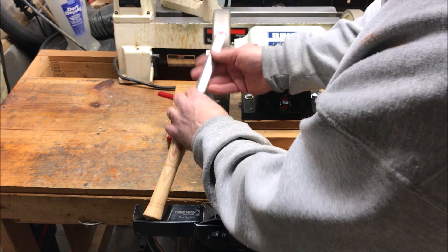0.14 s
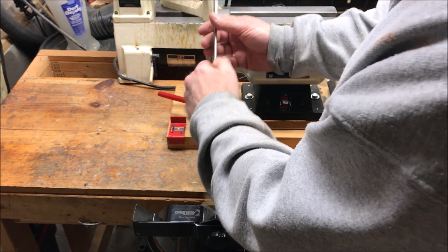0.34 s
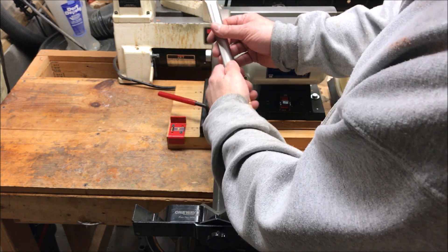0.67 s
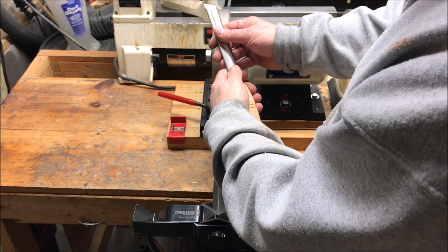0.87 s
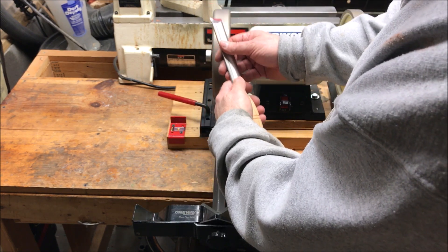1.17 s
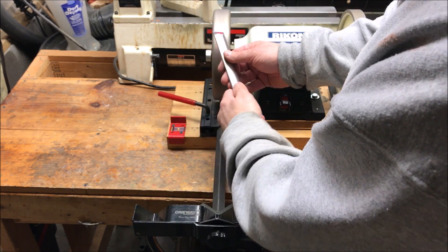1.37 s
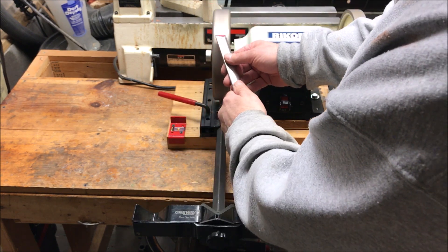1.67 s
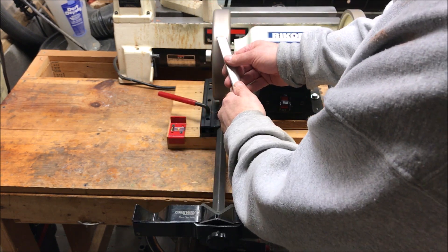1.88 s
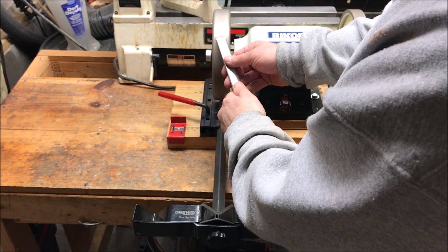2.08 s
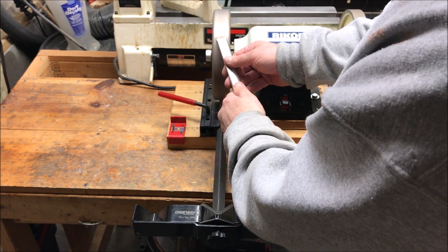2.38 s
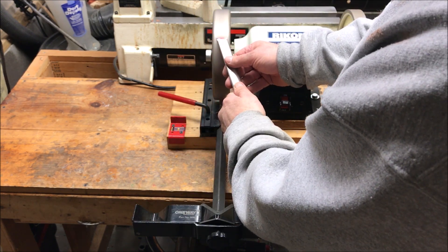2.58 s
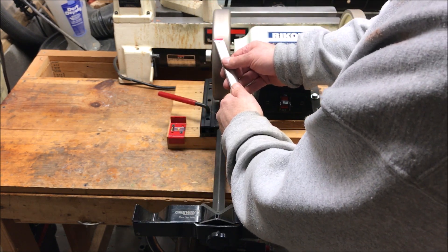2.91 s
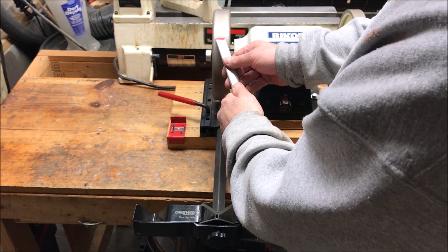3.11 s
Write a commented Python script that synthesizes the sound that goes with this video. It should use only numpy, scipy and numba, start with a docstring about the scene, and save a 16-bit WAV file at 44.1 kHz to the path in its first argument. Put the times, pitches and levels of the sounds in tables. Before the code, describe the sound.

Close single-microphone sound of an idling grinder in a small shop: brief bright grinding, a fading metallic ring, a scuff and double click midway, then uneven hissing contact that continues to the end.

```python
"""A slow bench grinder idles in a workshop: sines for hum and rotor-slot whine, filtered noise for bearing rush.
A steel chisel, driven by dense random grains, leaves the wheel, whose noise-driven modes ring on.
The tool is seated in its rest with a scuff and a click (short noise bursts through resonances),
then pressed to the wheel again. A noise rumble shudders in the bench and a noise tail stands for the shop.
One microphone, whose bass is turned down while the sound is loud."""
import sys
import numpy as np
from scipy import signal
from scipy.fft import rfft, irfft
from scipy.io import wavfile
from scipy.ndimage import uniform_filter1d
from numba import njit

SR = 44100
rng = np.random.default_rng(int(sys.argv[2]) if len(sys.argv) > 2 else 0)


def level_to_linear(level):
    """Convert decibel levels to linear amplitude factors, elementwise."""
    exponent = np.asarray(level, float) / 20
    return 10 ** exponent


def store_wav(level_fs):
    """Save 16-bit WAV to argv[1]."""
    pcm = np.round(np.clip(np.atleast_2d(level_fs), -1, 1) * 32767)
    wavfile.write(sys.argv[1], SR, pcm.T.astype(np.int16))


N = 143325

# motor tones, 48 rotor slots: [multiple of shaft speed, multiple of mains hum, level/dB rms]
MOTOR_TONES = [(2, 0, -64), (0, 1, -51), (0, 2, -52), (1, 2, -60), (2, 2, -52), (-1, 3, -60), (0, 3, -40),
               (1, 3, -59), (0, 4, -50), (-1, 6, -61), (27, 0, -62), (31, 0, -65), (33, 0, -65),
               (35, 0, -64), (48, -3, -62), (49, -2, -66), (48, -1, -61), (47, 0, -61), (48, 0, -48),
               (49, 0, -60), (51, 0, -79), (48, 1, -78), (48, 2, -72), (57, 0, -72), (58, 0, -67),
               (47, 3, -70), (48, 3, -66), (61, 0, -69), (62, 0, -66), (48, 4, -71), (48, 5, -76),
               (48, 6, -77), (96, -3, -78), (96, -2, -64), (90, 0, -74), (91, 0, -72), (96, -1, -59),
               (94, 0, -75), (96, 0, -69), (97, 0, -72), (99, 0, -77), (96, 1, -72), (96, 5, -79)]
# the low hum swells and sinks: [t/s, level/dB]
HUM_SWELL = [(0, 0), (.3, 1.5), (1.0, 1.5), (1.45, 1), (1.62, -2), (2.0, -.5), (2.6, .5), (3.25, 0)]
# outline of bearings, air and room: [f/Hz, relative level/dB per Hz]
RUSH_OUTLINE = [(15, -63), (25, -15.5), (120, -10.5), (185, -19), (363, -5.5), (416, -7.5), (476, -7.5),
                (531, -9), (1160, -16.5), (1440, -25), (1560, -20), (1840, -23.5), (2280, -32),
                (2690, -22.5), (3160, -41), (4490, -28), (16000, -58)]
# resonances of the grinder housing: [f/Hz, width/Hz, level/dB]
HOUSING_MODES = [(53.4, 5.6, -61.5), (185.2, 2.1, -61), (269.2, 9.3, -53.5), (629, 18, -64),
                 (702, 12, -56.5), (801.5, 2.7, -55), (1081, 7.9, -62.5), (1300, 46, -55.5),
                 (1880, 83, -59.5), (2600, 780, -70), (4390, 59, -65.5), (5240, 19, -69.5), (7200, 64, -75),
                 (9160, 190, -76), (11700, 2400, -80)]
# steel on the wheel, leaving and then pressing:
# [t/s, hiss level/dB, wheel ringing over hiss level/dB, tilt of the ringing/dB per octave]
LEAVING_PRESSURE = [(0, -26.5, 0.5, 3), (.035, -24.5, 4, 0.5), (.075, -24, 3, 1.5), (.11, -26.5, 2.5, -0.5),
                    (.13, -23, -3, 0.5), (.155, -25, -21, 6), (.168, -22.5, -6, -1.5), (.178, -35, -8, 3)]
PRESSING_PRESSURE = [(2.497, -39.5, 1, 11), (2.508, -33.5, 5.5, 11), (2.525, -31.5, -1, -2),
                     (2.57, -46, 3, 15), (2.579, -34, 0.5, 9.5), (2.66, -39.5, 9, -3.5),
                     (2.692, -32.5, 11, 1.5), (2.73, -32, 1, -8.5), (2.8, -28, 5, -1.7), (2.87, -29, 3, 4),
                     (2.95, -29.5, 3.5, 0.26), (3.02, -30, 4, 1.5), (3.1, -28, 0, 1.7),
                     (3.19, -30, 4.5, 4.5), (3.21, -28, 7.5, -0.5), (3.25, -31, -1, 0)]
# outline of the grit hiss: [f/Hz, relative level/dB per Hz]
GRIT_OUTLINE = [(500, -20.5), (1000, -16), (1700, -13.5), (2200, -9.5), (3000, -3), (4200, -2), (4900, -4),
                (7700, -13), (10000, -7.5), (13000, -6.5), (14600, -27), (15500, -7.5)]
# pitches of the hand-damped chisel: [f/Hz]
CHISEL_PITCHES = [1050, 2652, 2684, 3280, 3410, 3662, 3860, 4050, 5577, 5631, 5830, 6735, 7010, 7180, 8620,
                  9780, 11900, 12100]
# the same modes: [width/Hz, level over hiss leaving/dB, level over hiss pressing/dB]
CHISEL_MODES = [(190, -34, -27), (19.7, -23, -11), (24.9, -16.5, -12), (30, -44, -15.5), (59, -14.5, -39),
                (40, -12.5, -15), (45, -24, -10), (50, -23, -25), (24.9, -20.5, -5), (25, -43, -13),
                (100, -15.5, -13), (56, -15.5, -9), (110, -31, -13), (100, -9.5, -9.5), (150, -8.5, -8),
                (60, -24, -9.5), (120, -20, -8), (550, -9, -35)]
# pitches of the steel wheel: [f/Hz]
WHEEL_PITCHES = [1564.2, 1679.6, 4182, 4229, 4356, 7540, 7768, 7903, 8018, 8689, 10654, 10829, 11189, 11467,
                 12090, 13660, 13890, 14290, 14438, 14727, 15050]
# the same modes: [level struck at lift-off/dB, free t60/s, relative level while ground/dB]
WHEEL_MODES = [(-42.5, 3.5, -28), (-31, 3.05, -19), (-38, 0.78, -3.5), (-39, .4, -17.5), (-32, 0.61, -8.5),
               (-46, 0.41, -17), (-48, .9, -20), (-37, 0.27, -11), (-29.5, 0.22, -10), (-57, .37, -39),
               (-50, 0.3, -15), (-41, 0.3, -19), (-35, 0.96, -13.5), (-43, 0.87, -17), (-49, 0.17, -29),
               (-45, 0.82, -22), (-50, 0.4, -20), (-48, 0.55, -28), (-31, 0.7, -11), (-43, .36, -15),
               (-47, 0.72, -33)]
# the tool shakes the bench: [t/s, level/dB rms]
BENCH_SHUDDER = [(0, -65), (.1, -47), (.17, -37.5), (.2, -59), (2.52, -63.5), (2.55, -41), (2.8, -45),
                 (2.85, -65), (3.05, -51), (3.15, -70), (3.25, -58)]
# contacts of the tool butt in its rest: [t/s, contact strength/dB, brightness f/Hz, scuff length/s]
SEATING_CONTACTS = [(1.2445, -35, 2840, 0.032), (1.254, -25, 1200, 0.005), (1.266, -28, 730, 0.0023),
                    (1.277, -21.5, 600, 0.0013), (1.3463, -22.5, 17500, 0.017),
                    (1.354, -19.5, 3030, 0.0037), (1.371, -24.5, 1300, 0.0061), (1.4, -34.5, 960, 0.0059)]
# resonances of the rest: [f/Hz, width/Hz, relative level/dB]
REST_MODES = [(355, 47, 1.5), (624, 90, 0), (1040, 61, 3), (1400, 500, -7), (1850, 70, -7), (2640, 90, 5),
              (3300, 1500, -6), (3950, 80, -9), (4350, 60, -9), (5570, 70, 0), (5810, 60, -1)]
# dips of all that lies between the ringing tones: [middle t/s, length/s, level/dB at the middle]
NOISE_DIPS = [(2.526, 0.022, -22), (2.699, .022, -13), (2.837, 0.044, -29), (3.124, 0.026, -12),
              (3.189, 0.022, -12)]

SHAFT_HZ, MAINS_HUM_HZ = 29.888, 120.03
TONE_WAVER_DB, TONE_WAVER_HZ = 0.7, 2.3
HUM_TOP_HZ = 500  # motor tones above this count as whine
RUSH_DB, RUSH_THROB = -47, 0.19
GRAINS_PER_S, GRAIN_SPREAD_DB = 9000, 2.5
GRIP_DB, GRIP_HZ = 0.5, 13.5  # the shifting grip favours now one mode, now another
LIFT_OFF_S = 0.165
SLIDE_OFF_S = 0.014  # the edge drags off the rim for this long
LEAVING_T60_S, PRESSING_T60_S = 0.16, 0.4  # wheel damping under the edge
TILT_PIVOT_HZ = 6000
SHARP_HZ = 65  # narrower chisel modes are heard as tones, wider ones as coloured hiss
CORE_HZ = 130  # band around a mode that is heard as its tone
SHUDDER_LOW_HZ, SHUDDER_HIGH_HZ = 580, 1300
SHOP_DB, SHOP_CUT_HZ = -13.5, 8000
SHOP_T60_S, SHOP_TREBLE_T60_S = 0.5, 0.37  # below and above the cut
KNOCK_SHARE = 0.6  # share of each contact's energy in its opening knock
REST_CRACK_DB, REST_BODY_DB = -15, -16  # direct contact, resonances of the rest
BASS_HZ, BASS_KNEE_DB, BASS_SLOPE, BASS_RELEASE_HZ = 170, -31, 0.7, 1.5
TOP_HZ = 15850


def rms_one(x):
    """Scale to unit rms."""
    return x / np.sqrt(np.mean(x ** 2) + 1e-20)


def in_time(rows, outside=None):
    """Columns of a curve at every sample."""
    s, *columns = np.transpose(rows)
    t = np.arange(N) / SR
    return np.array([np.interp(t, s, c, outside, outside) for c in columns])


def coloured(x, outline):
    """Shape a steady signal by an outline in Hz and dB; rms 1."""
    hz, db = np.transpose(outline)
    grid = np.maximum(np.arange(N // 2 + 1) * SR / N, 1)
    gain = level_to_linear(np.interp(np.log(grid), np.log(hz), db))
    return rms_one(irfft(rfft(x) * gain, N))


def drift(rate_hz):
    """Slow chance with spread 1, drawn at every 40th sample."""
    r = np.exp(-2 * np.pi * rate_hz * 40 / SR)
    white = rng.standard_normal(N // 40 + 2002)
    slow = signal.lfilter([1], [1, -2 * r, r * r], white)[2000:]
    return np.interp(np.arange(N) / 40, np.arange(len(slow)), rms_one(slow))


def resonance(x, hz, width_hz):
    """Two-pole resonance that turns unit noise into unit noise."""
    r = np.exp(-np.pi * width_hz / SR)
    zeros = np.sqrt((1 - r * r) / 2) * np.array([1, 0, -1])
    poles = [1, -2 * r * np.cos(2 * np.pi * hz / SR), r * r]
    return signal.lfilter(zeros, poles, x + 1e-18)


def core(x, hz):
    """The part of a ringing mode close to its pitch."""
    return np.sqrt((1 - np.exp(-2 * np.pi * CORE_HZ / SR)) / 2) * resonance(x, hz, CORE_HZ)


@njit
def ring(drive, keep, turn):
    """A mode whose damping changes from sample to sample."""
    out, state = np.zeros(len(drive)), 0j
    for i in range(len(drive)):
        state = state * turn * keep[i] + drive[i]
        out[i] = state.imag
    return out


def motor_tones():
    """Low hum and whine: sines at sums of shaft and mains multiples, wavering a little; only the hum swells."""
    t = np.arange(N) / SR
    hum, whine = np.zeros(N), np.zeros(N)
    wavers = [level_to_linear(TONE_WAVER_DB * drift(TONE_WAVER_HZ)) for _ in range(6)]
    swell = level_to_linear(in_time(HUM_SWELL)[0])
    for k, (shaft, mains, db) in enumerate(MOTOR_TONES):
        hz = shaft * SHAFT_HZ + mains * MAINS_HUM_HZ
        # pure mains multiples start in step, tones of the shaft anywhere
        phase = 0.25 + rng.random() * (shaft != 0)
        level = np.sqrt(2) * level_to_linear(db) * wavers[k % 6]
        tone = level * np.sin(2 * np.pi * (hz * t + phase))
        if hz > HUM_TOP_HZ:
            whine += tone
        else:
            hum += tone * swell
    return hum, whine


def bearing_rush():
    """Steady broadband noise, plus housing resonances fed with noise that throbs with the mains."""
    t = np.arange(N) / SR
    rush = level_to_linear(RUSH_DB) * coloured(rng.standard_normal(N), RUSH_OUTLINE)
    throb = 1 + RUSH_THROB * np.sin(2 * np.pi * MAINS_HUM_HZ * t)
    shaking = rng.standard_normal(N) * throb
    for hz, width_hz, db in HOUSING_MODES:
        rush += level_to_linear(db) * resonance(shaking, hz, width_hz)
    return rush


def grit_grains():
    """Dense grit strikes: sparse impulses of random size and sign; rms 1."""
    size_db = GRAIN_SPREAD_DB * np.minimum(rng.exponential(1, N), 5)
    sizes = level_to_linear(size_db) * rng.choice([-1, 1], N)
    return rms_one(sizes * (rng.random(N) < GRAINS_PER_S / SR))


def chisel(grains, leaving, pressing):
    """The grains shake the hand-damped chisel; narrow modes give tones, the rest goes to the hiss."""
    hiss, tones = np.zeros(N), np.zeros(N)
    for hz, (width_hz, leaving_db, pressing_db) in zip(CHISEL_PITCHES, CHISEL_MODES):
        force = leaving * level_to_linear(leaving_db) + pressing * level_to_linear(pressing_db)
        grip = level_to_linear(GRIP_DB * drift(GRIP_HZ))
        mode = resonance(grains * grip * force, hz, width_hz)
        tone = core(mode, hz) * (width_hz < SHARP_HZ)
        tones += tone
        hiss += mode - tone
    return hiss, tones


def wheel(leaving, pressing):
    """Noise force rings the wheel, damped under the edge; a blow at lift-off leaves it ringing freely."""
    t = np.arange(N) / SR
    _, ringing_db, tilt_db = in_time(LEAVING_PRESSURE + PRESSING_PRESSURE)
    pressure = leaving * (t < LIFT_OFF_S - SLIDE_OFF_S) + pressing
    touched = pressure > 1e-5
    touched_t60 = np.where(t < LIFT_OFF_S, LEAVING_T60_S, PRESSING_T60_S)
    held = level_to_linear(-60 / (touched_t60 * SR))
    hiss, tones = np.zeros(N), np.zeros(N)
    for hz, (struck_db, free_t60, ground_db) in zip(WHEEL_PITCHES, WHEEL_MODES):
        tilt = tilt_db * np.log2(hz / TILT_PIVOT_HZ)
        force = pressure * level_to_linear(ground_db + ringing_db + tilt)
        drive = rng.standard_normal(N) * force * np.sqrt(2 * (1 - held * held))
        # each mode is let go at its own moment of the slide
        let_go_s = LIFT_OFF_S + SLIDE_OFF_S * rng.uniform(-0.5, 0.5)
        drive[int(let_go_s * SR)] += level_to_linear(struck_db)
        keep = np.where(touched, held, level_to_linear(-60 / (free_t60 * SR)))
        mode = ring(drive, keep, np.exp(2j * np.pi * hz / SR))
        tone = core(mode, hz)
        tones += tone
        hiss += mode - tone
    return hiss, tones


def grinding():
    """Steel on the wheel: direct grit hiss, the shaken chisel and the ringing wheel follow the pressure."""
    leaving = level_to_linear(in_time(LEAVING_PRESSURE, -200)[0])
    pressing = level_to_linear(in_time(PRESSING_PRESSURE, -200)[0])
    grains = grit_grains()
    grit_hiss = coloured(grains, GRIT_OUTLINE) * (leaving + pressing)
    chisel_hiss, chisel_tones = chisel(grains, leaving, pressing)
    wheel_hiss, wheel_tones = wheel(leaving, pressing)
    return grit_hiss + chisel_hiss + wheel_hiss, chisel_tones + wheel_tones


def shudder():
    """The bench rumbles under grinding: band-passed noise that follows a level curve."""
    band = signal.butter(2, [SHUDDER_LOW_HZ, SHUDDER_HIGH_HZ], "band", fs=SR, output="sos")
    rumble = rms_one(signal.sosfilt(band, rng.standard_normal(N)))
    return level_to_linear(in_time(BENCH_SHUDDER)[0]) * rumble


def shop(x):
    """Diffuse tail of the workshop: dying noise whose treble dies first."""
    t = np.arange(SR // 2) / SR
    white = rng.standard_normal(len(t))
    dull = signal.sosfilt(signal.butter(2, SHOP_CUT_HZ, fs=SR, output="sos"), white)
    tail = dull * level_to_linear(-60 * t / SHOP_T60_S) + (white - dull) * level_to_linear(-60 * t / SHOP_TREBLE_T60_S)
    tail *= t > 0.004  # the tail sets in after 4 ms
    tail /= np.sqrt(np.sum(tail ** 2))
    return level_to_linear(SHOP_DB) * signal.fftconvolve(x, [tail], axes=1)[:, :N]


def seating():
    """Each contact is a knock and a short scuff, low-passed to its brightness, through the body of the rest."""
    t = np.arange(SR // 8) / SR
    contacts = np.zeros(N)
    for s, db, bright_hz, length_s in SEATING_CONTACTS:
        burst = rng.standard_normal(len(t)) * np.exp(-t / length_s) * np.sqrt(1 - KNOCK_SHARE)
        burst[0] = np.sqrt(KNOCK_SHARE * length_s * SR / 2)
        lowpass = signal.butter(4, min(bright_hz, 0.45 * SR), fs=SR, output="sos")
        makeup = np.sqrt(SR / 2 / bright_hz)  # restores the energy lost to the low-pass
        start = int(s * SR)
        contacts[start:][:len(t)] += level_to_linear(db) * makeup * signal.sosfilt(lowpass, burst)
    body = sum(level_to_linear(db) * resonance(contacts, hz, width_hz) for hz, width_hz, db in REST_MODES)
    return level_to_linear(REST_CRACK_DB) * contacts + level_to_linear(REST_BODY_DB) * body


def dropouts():
    """Gain of the noisy layers and the whine: one, with short rounded dips."""
    t = np.arange(N) / SR
    dip_db = np.zeros(N)
    for middle_s, length_s, db in NOISE_DIPS:
        dip_db += db * np.cos(np.pi * np.clip((t - middle_s) / length_s, -0.5, 0.5))
    return level_to_linear(dip_db)


def scene():
    """All sources and the shop tail reach one microphone, as two equal channels."""
    hum, whine = motor_tones()
    rush = bearing_rush()
    hiss, ringing = grinding()
    noisy = hiss + shudder()
    near = ringing + seating()
    noisy_tail, near_tail = shop(np.array([noisy, near]))
    steady = hum + near + near_tail
    dipping = dropouts() * (whine + rush + noisy + noisy_tail)
    return np.tile(steady + dipping, (2, 1))


def bass_turned_down(dry):
    """The bass sinks at once when the level passes a knee and recovers slowly."""
    level_db = 10 * np.log10(uniform_filter1d(dry[0] ** 2, size=4096) + 1e-12)
    over_db = np.maximum(level_db - BASS_KNEE_DB, 0)
    r = np.exp(-2 * np.pi * BASS_RELEASE_HZ / SR)
    slow_db = signal.lfilter([1 - r], [1, -r], over_db, zi=[over_db[0] * r])[0]
    over_db = np.maximum(over_db, slow_db)
    bass = signal.sosfiltfilt(signal.butter(2, BASS_HZ, fs=SR, output="sos"), dry)
    return dry + bass * (level_to_linear(-BASS_SLOPE * over_db) - 1)


def band_limit(x):
    """A steep low-pass at the top of the band."""
    return signal.sosfilt(signal.butter(12, 16460, fs=SR, output="sos"), x)


def record(dry):
    """The microphone's bass gives way to loud sound, then a steep low-pass cuts the top."""
    top_cut = signal.ellip(10, 0.5, 50, TOP_HZ, fs=SR, output="sos")
    heard = signal.sosfilt(top_cut, bass_turned_down(dry))
    return band_limit(heard)


dry = scene()
out = record(dry)
store_wav(out)
```